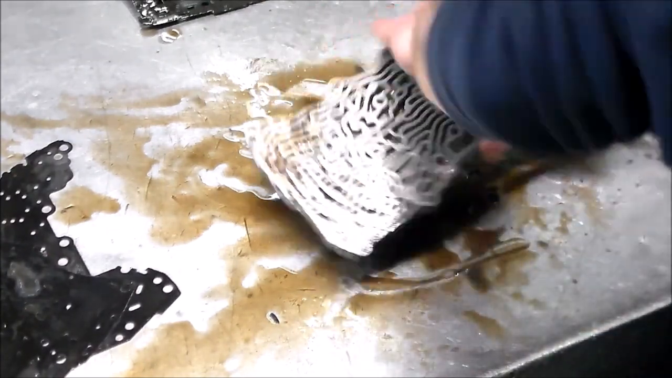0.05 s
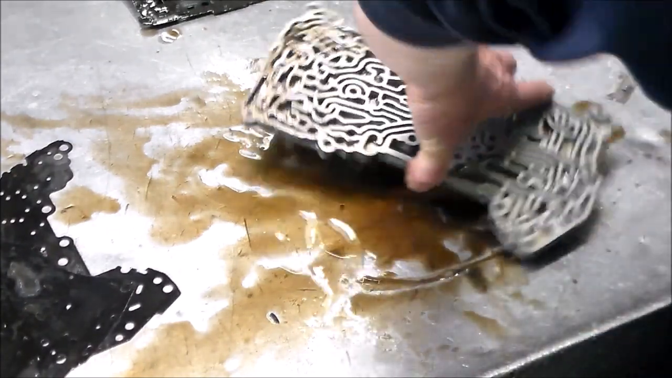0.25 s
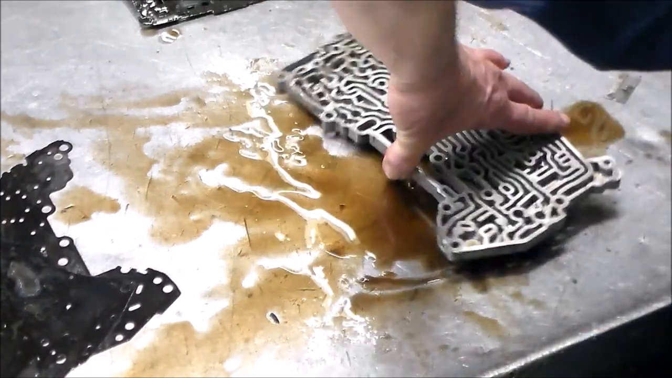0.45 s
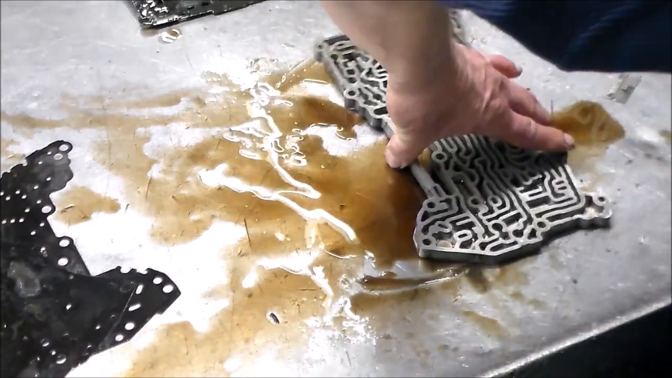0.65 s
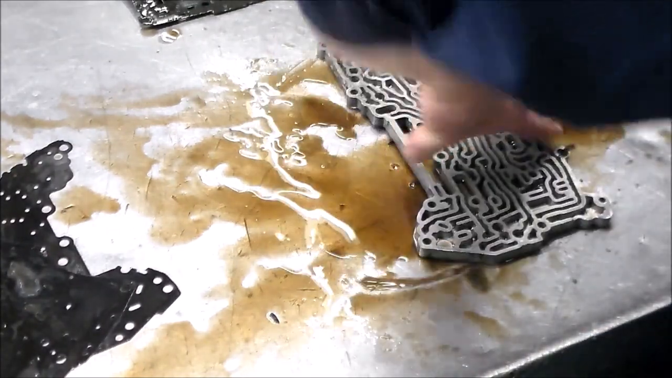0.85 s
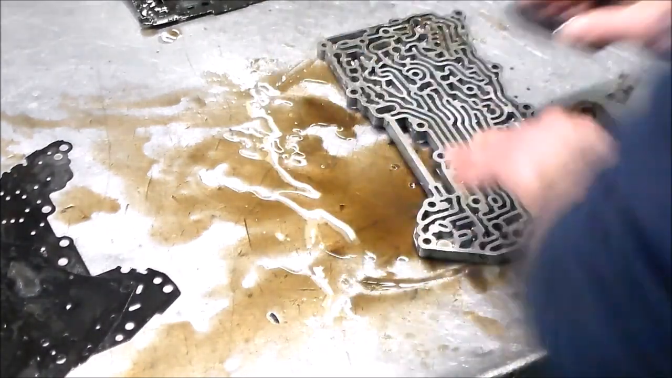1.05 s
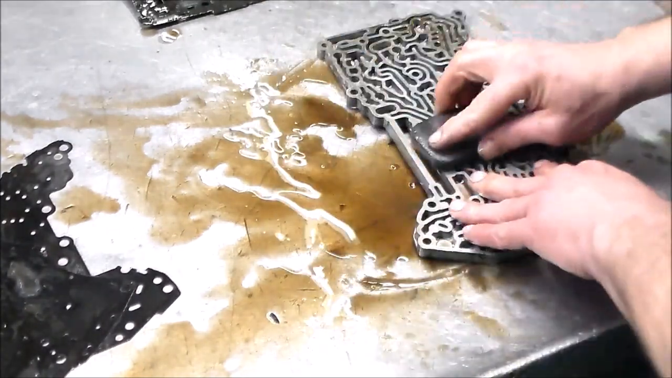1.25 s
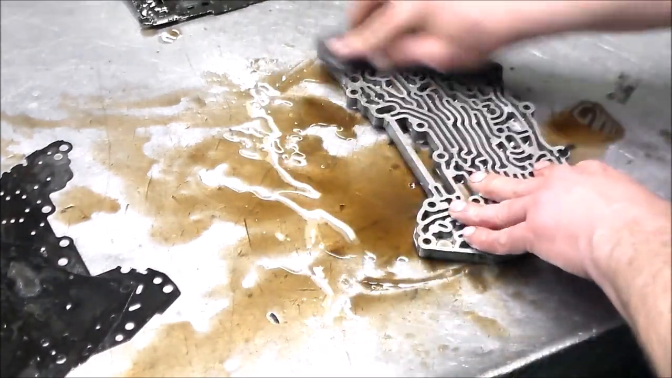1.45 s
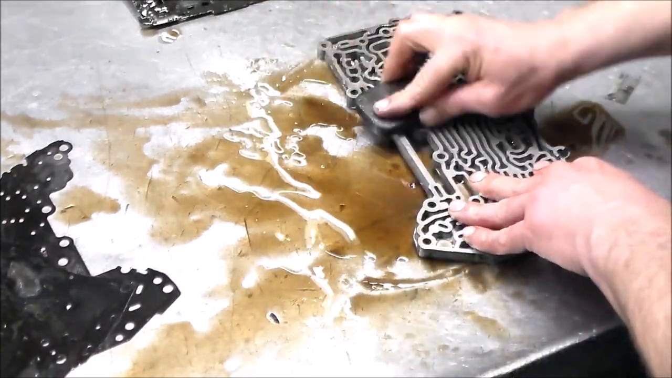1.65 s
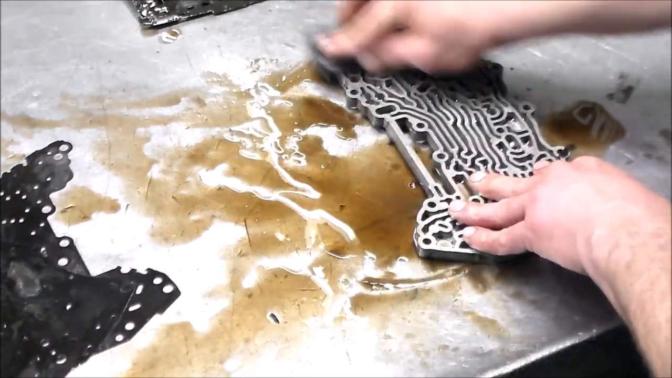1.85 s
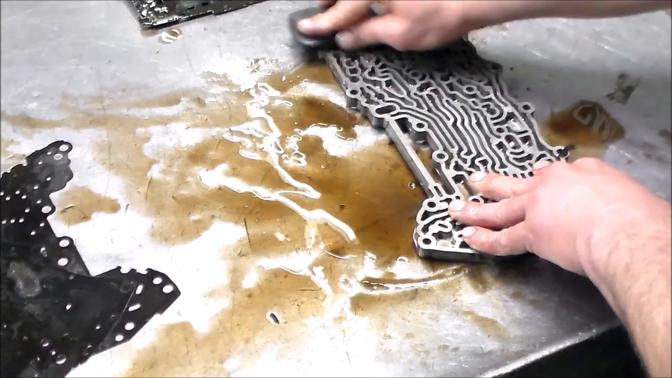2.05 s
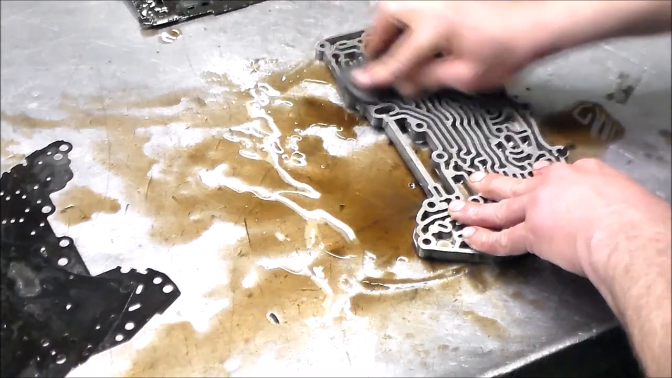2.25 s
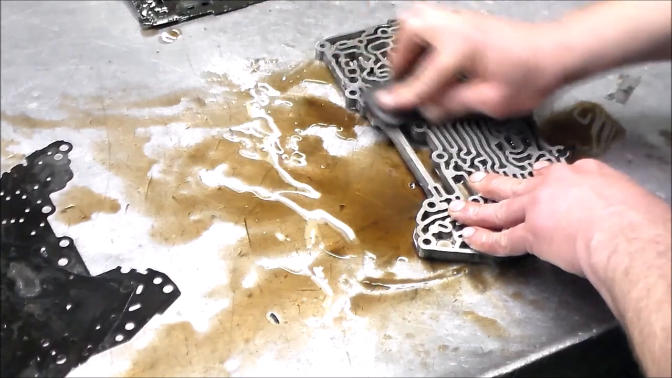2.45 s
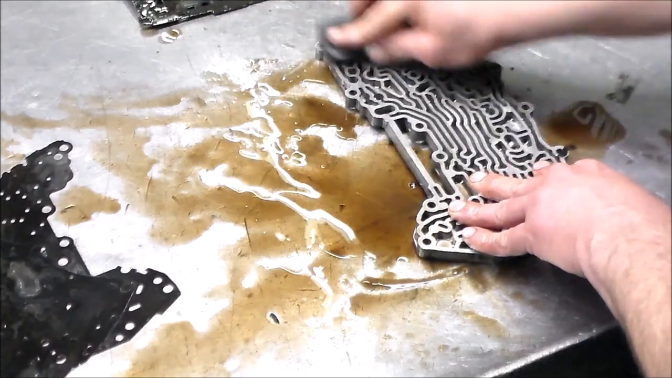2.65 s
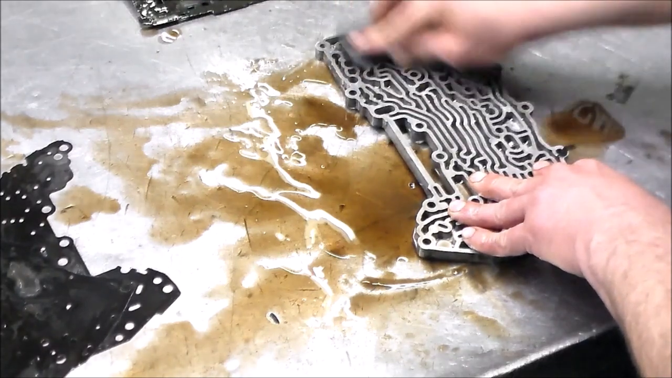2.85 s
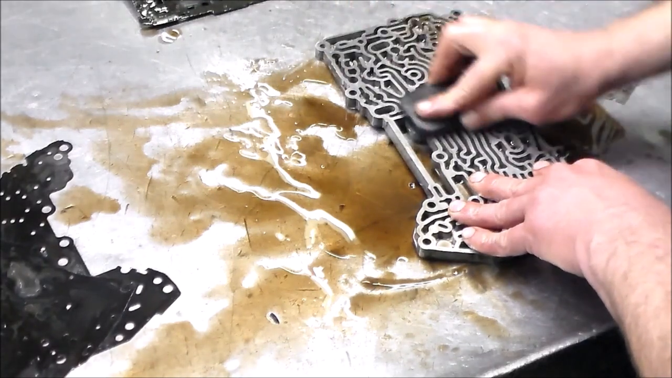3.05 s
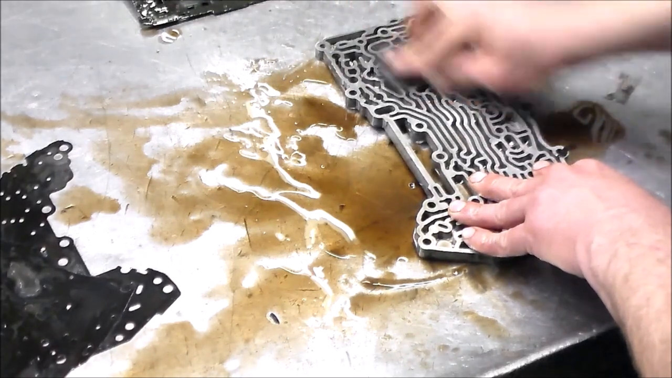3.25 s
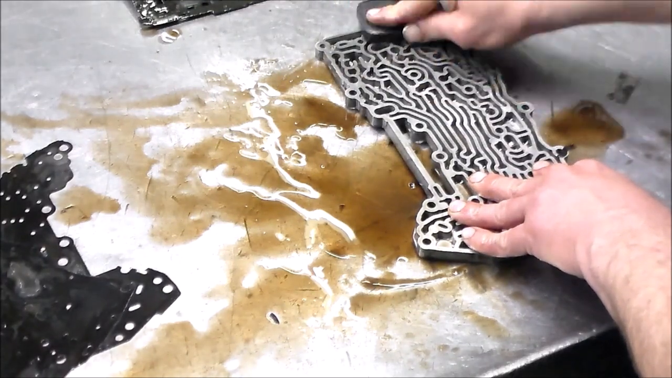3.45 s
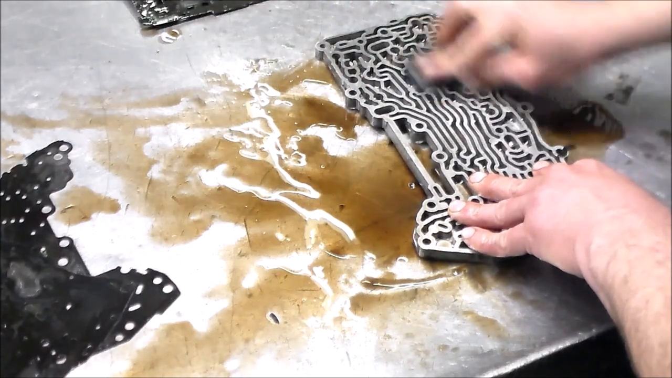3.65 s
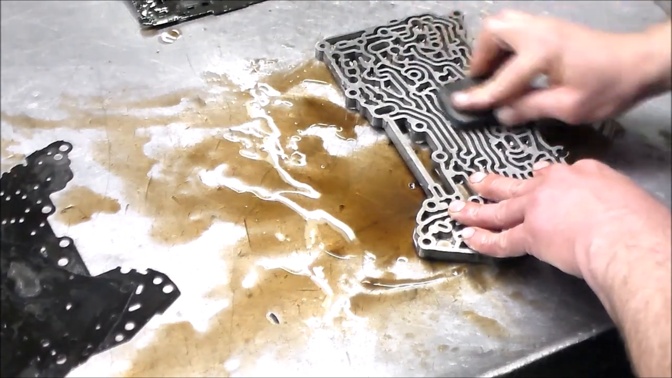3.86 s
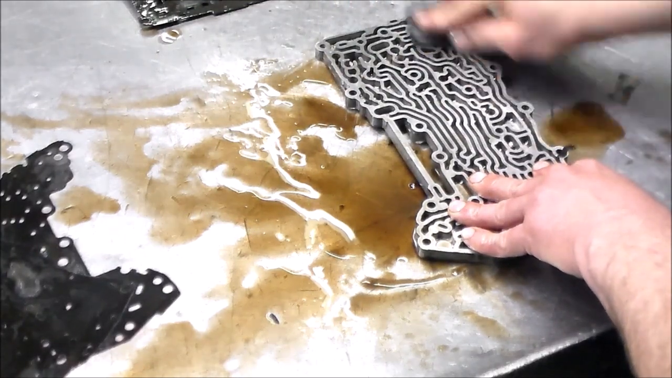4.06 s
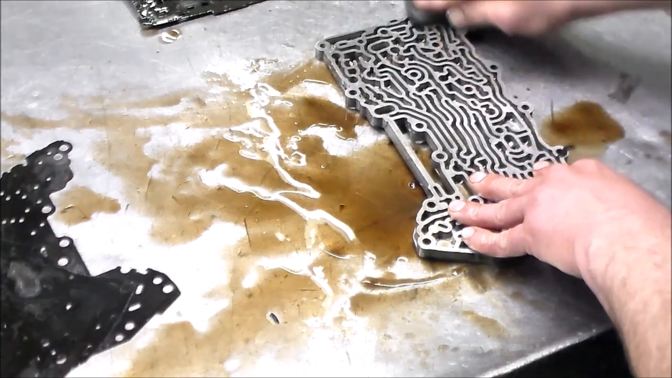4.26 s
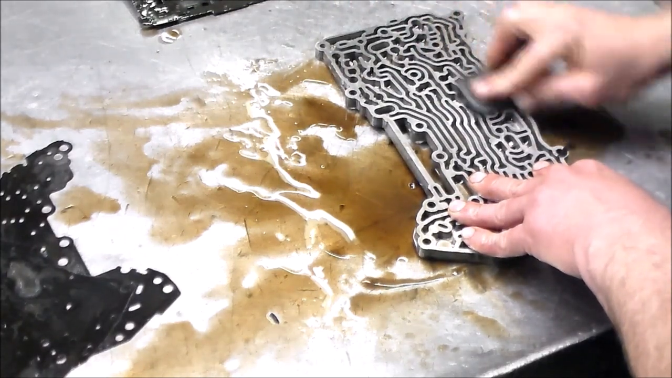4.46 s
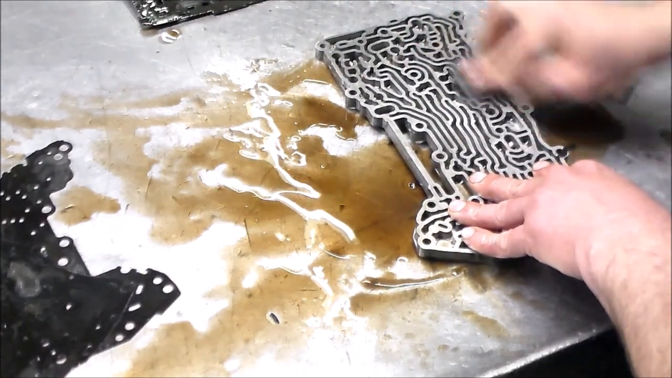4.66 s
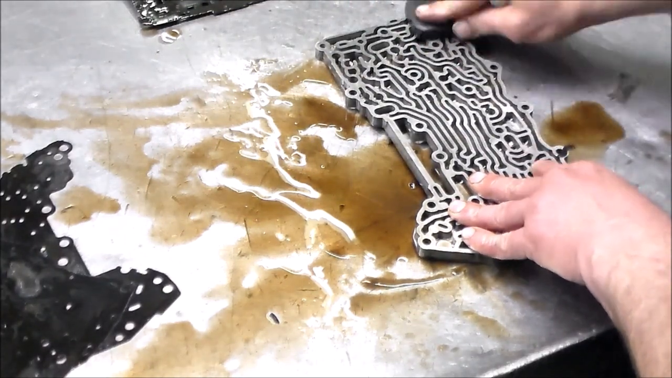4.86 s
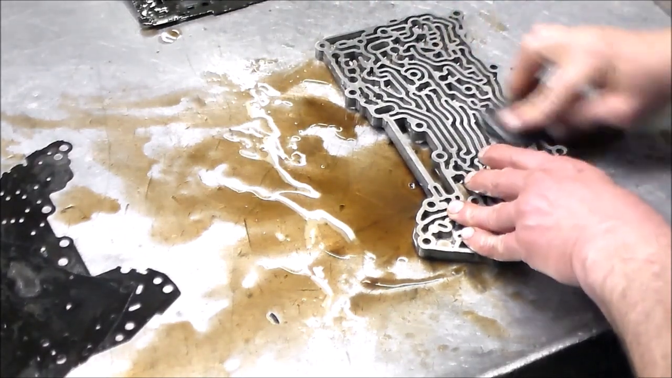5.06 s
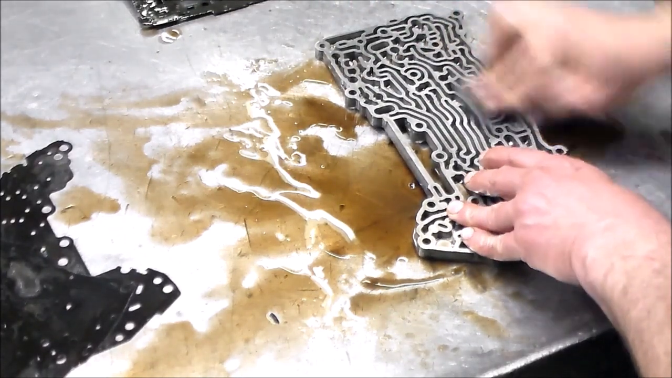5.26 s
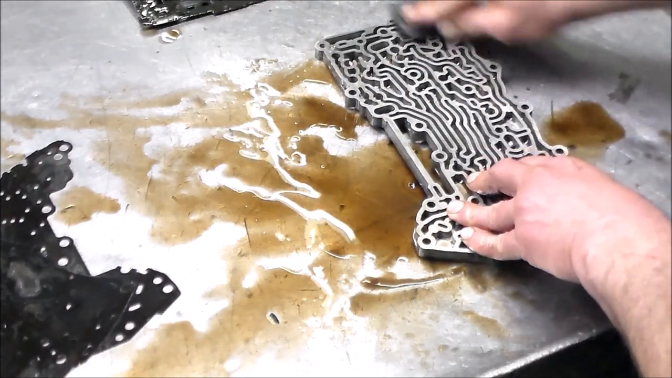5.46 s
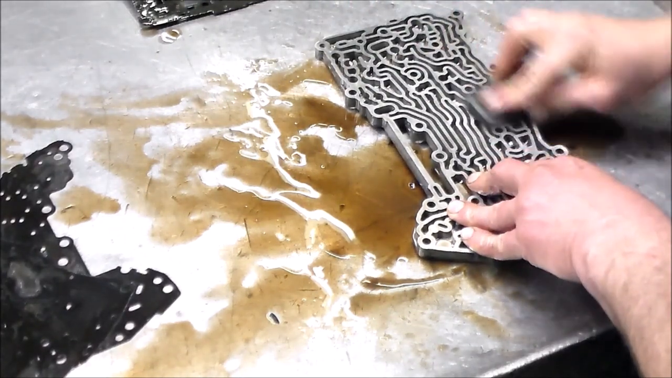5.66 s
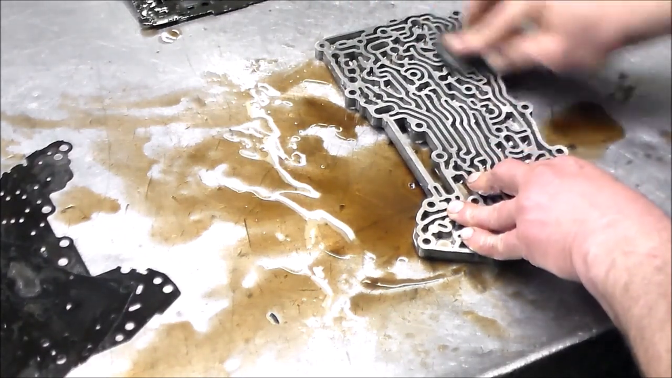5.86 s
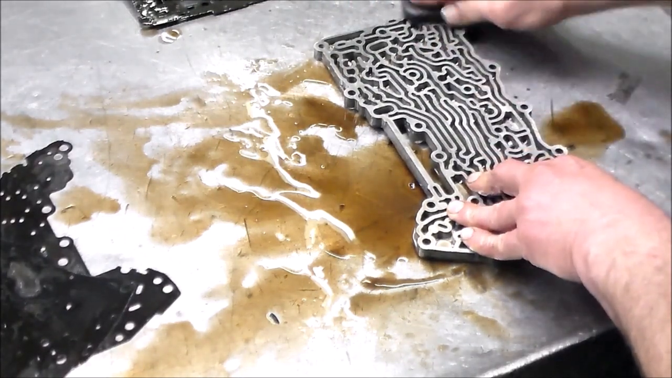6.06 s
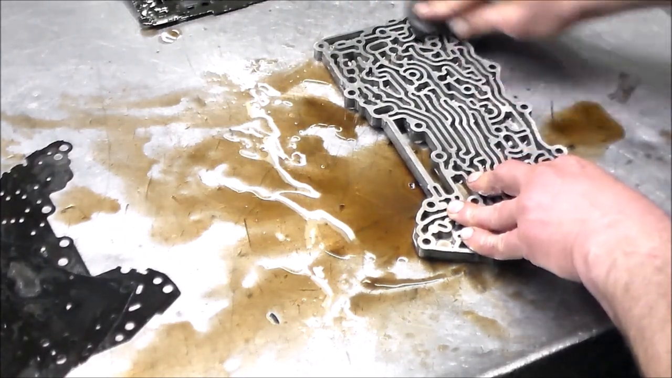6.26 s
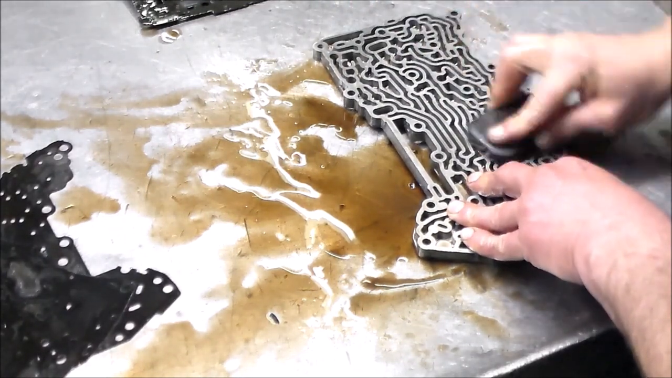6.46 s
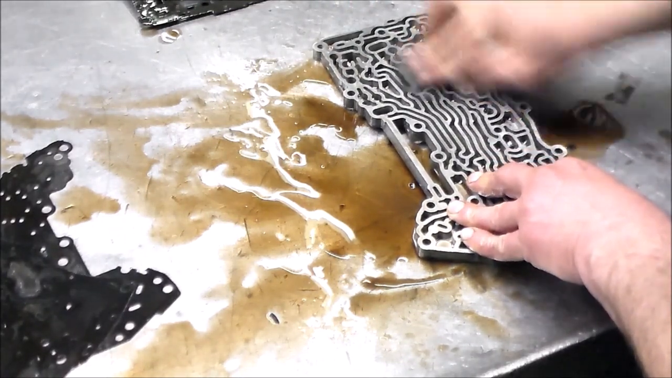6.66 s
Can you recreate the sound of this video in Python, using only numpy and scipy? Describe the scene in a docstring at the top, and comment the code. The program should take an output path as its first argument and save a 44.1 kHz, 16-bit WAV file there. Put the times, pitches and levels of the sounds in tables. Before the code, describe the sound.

Metallic clank and clatter of a plate set on a steel bench, then fast, gritty back-and-forth stone rubbing with sharp catches and brief squeaks.

```python
"""First come a quiet workshop's air noise, faint ticks and a thin wavering tone. A cast metal plate is then
laid on a steel bench and rocks once: cracks, clatter noise, and dying tones of plate and bench. A stone is set
on it and rubbed over its ribs, about seven strokes a second: shaped noise and short rings, with harder catches
and gliding squeaks, while low noise is heard as the bench shakes. A small device with two close microphone
ports stands near; its gain control raises quiet sound."""
import sys
import numpy as np
from scipy import signal
from scipy.fft import rfft, irfft
from scipy.io import wavfile
from scipy.ndimage import uniform_filter1d

SR = 44100
rng = np.random.default_rng(int(sys.argv[2]) if len(sys.argv) > 2 else 0)


def generate_wav(sig):
    """Save sig (samples, or channels by samples) to the path in sys.argv[1] as 16-bit PCM at SR."""
    pcm = np.round(np.clip(np.atleast_2d(sig).T, -1, 1) * 32767).astype(np.int16)
    wavfile.write(sys.argv[1], SR, pcm)


N = 296352

# All source levels are set ahead of the gain control; colours give only the shape of a spectrum.

# workshop air and microphone hiss, colour: (frequency [Hz], level [dB per Hz])
AIR_COLOUR = [(8.8, -72), (15, 10), (39, -20), (59, -10.5), (118, -15), (167, -23), (198, -21.5),
              (362, -27.5), (406, -27), (525, -29.5), (831, -25.5), (2270, -36.5), (14200, -39)]
AIR_DB = -57
# likeness of the air noise at the two ports: (frequency [Hz], likeness [0-1])
AIR_LIKENESS = [(60, 0.81), (230, 0.72), (920, 0.9), (3580, 0), (14000, 0.13)]
# the bench shakes under the arm: (time [s], level [dB])
SHAKE = [(1.47, -73), (1.78, -80), (1.94, -47.5), (2.98, -51), (3.01, -55.5), (3.21, -47.5), (3.3, -58),
         (3.39, -47.5), (3.77, -45.5), (3.84, -53.5), (4.03, -42), (4.12, -49), (4.7, -46), (4.79, -51),
         (4.83, -43.5), (6.22, -44), (6.34, -45.5), (6.72, -48)]
# colour of that shaking: (frequency [Hz], level [dB per Hz])
SHAKE_COLOUR = [(8.8, -32), (15, -6), (59, -1.5), (70, 6.5), (86, -14.5), (108, -9), (157, -9),
                (349, -14.5), (400, -13.5), (520, -25), (880, -120)]
# faint thin tone, before its flicker: (time [s], level [dB])
WHISTLE = [(.17, -90), (.2, -75), (.28, -78), (.31, -85), (.34, -71), (.42, -77), (.45, -90)]
WHISTLE_HZ = 5800  # middle pitch
# faint ticks: (time [s], level [dB], frequency [Hz])
TICKS = [(.06, -69, 4000), (.365, -67, 6500), (.42, -71, 5500), (1.168, -67.5, 5000)]

# likeness of the nearby sounds at the two ports: (frequency [Hz], likeness [0-1])
LIKENESS = [(60, 0.87), (100, 0.92), (180, 0.98), (310, 0.94), (530, 1), (920, 0.96), (1580, 1),
            (2720, 0.92), (4700, 0.63), (8110, 0.26), (14000, 0.38)]
# how far the left port leads: (frequency [Hz], lead [radians])
LEAD = [(0, 0.053), (5170, 0.19), (6030, -0.39), (9040, -0.21), (11800, 0.97), (12200, -0.21),
        (14100, -0.1)]
# how much louder the left port is: (frequency [Hz], left minus right [dB])
LEAN = [(60, -2), (110, 0), (200, -0.5), (370, 0.5), (680, -0.5), (1240, 0.0), (2270, 0.0), (4160, -2),
        (7630, -1.5), (14000, 2.5)]
# how long echoes take to fall 60 dB: (frequency [Hz], t60 [s])
ROOM = [(150, 1), (400, 0.63), (1040, 0.71), (2760, 0.55), (7280, 0.41)]
EDGE_HZ = 14150  # upper band limit of the device

# plate down, plate rocks, stone down: (time [s], crack peak [dB], clatter [dB],
# hardness [dB per octave], ring [dB], thud [dB], room [dB])
BLOWS = [(.590, -14, -27, -.5, -32.5, -35, -26), (.775, -28, -27.5, -1.5, -35, -35, -32),
         (1.367, -18, -25, 2, -33.5, -56, -34)]
# blow by blow, a hand on the plate lowers and damps its modes: (pitch [factor], damping [factor])
HELD = [(1, 1), (1, 3), (.955, 1.8)]
# modes of the plate when not held: (frequency [Hz], relative level [dB], t60 [s])
PLATE = [(662, -12, .2), (996, -18, .19), (1723, -10, .25), (2439, -10, .2), (2698, -6, .5), (2719, 0, .6),
         (2752, -9, .3), (3456, -7, .25), (3962, -12, .15), (4750, -8, .06), (5400, -15, .13)]
# modes of the steel bench top: (frequency [Hz], relative level [dB], t60 [s])
BENCH = [(186, -4, .22), (248, 0, .2), (266, -1, .2), (360, -7, .2), (417, -5, .25), (582, -9, .2),
         (700, -6, .2), (780, -8, .2)]
# the plate's countless small modes together, colour: (frequency [Hz], level [dB per Hz])
CLATTER = [(90, -5), (200, -7), (700, 2), (1500, -5.5), (2700, 0.5), (5400, -4), (7500, -14), (11000, -24),
           (14200, -30)]

# short squeaks as the stone binds, level before the roughness:
# (time [s], length [s], start [Hz], middle [Hz], end [Hz], level [dB])
SQUEAKS = [(3.265, .03, 1450, 1420, 1400, -36), (4.07, .05, 2450, 2300, 2300, -37),
           (4.385, .04, 2900, 2900, 2900, -36), (5.24, .16, 2600, 2230, 2500, -37),
           (6.065, .04, 1250, 1180, 1100, -38), (6.47, .04, 2400, 2450, 2550, -36)]
# hard catches on a rib edge, before the sharing between ports: (time [s], peak [dB], frequency [Hz])
CATCHES = [(1.95, -21, 3080), (2.1188, -24, 2540), (2.5043, -19, 2500), (2.539, -23, 2460),
           (2.7668, -21, 3000), (2.942, -17, 5070), (3.0553, -16.5, 3000), (3.238, -25, 2670),
           (3.3427, -16, 3050), (3.6103, -18, 4380), (3.888, -23, 3060), (4.0814, -20, 2400),
           (4.1641, -29, 2270), (4.3442, -14.5, 4800), (4.4384, -14, 4530), (4.6353, -13.5, 5360),
           (4.7263, -19, 2790), (4.7662, -16.5, 5000), (4.9423, -13, 4350), (5.016, -24, 2800),
           (5.3264, -20, 3800), (5.8696, -13.5, 5200), (6.1208, -11.5, 4440), (6.488, -24, 2400)]
CATCH_RISE_S, CATCH_DRAG_S = 0.00092, 0.0065
CATCH_WIDTH = 1.1  # the band runs from the frequency divided by this to the frequency times this

# strokes of the stone, push and pull in turn: (turn [s], loudest [s], rasp at turn [dB], rasp at loudest [dB],
# breadth of rise [1 = pointed], breadth of fall [1 = pointed], extra scrape at turn [dB],
# extra scrape at loudest [dB], extra grit [dB], hollow under the stone [Hz], basic hollow lift [dB])
STROKES = [(1.482, 1.59, -45.5, -29, 0.96, 1.06, -5, 4.5, -3, 2680, 7.8),
           (1.655, 1.684, -44, -36, 1.4, 2.1, 6.5, 6.5, 0, 2600, 8.1),
           (1.795, 1.887, -51.5, -27, 1.15, 0.97, -2, 7.5, 1.5, 2860, 6.6),
           (1.943, 1.979, -35.5, -25.5, 1.4, 2.5, 5, 4, 2.5, 2700, 8.7),
           (2.062, 2.134, -36, -24.5, 1.4, 1.9, 2, 0, 2, 2600, 9.1),
           (2.207, 2.255, -35, -24, 1.4, 1.7, 6.5, 4, 0.5, 2530, 5.5),
           (2.345, 2.417, -36, -24, 1.5, 1.3, -1.5, 0, 3, 2730, 10),
           (2.481, 2.512, -38.5, -25, 1.1, 1.8, 8, 0, 0.5, 2600, 5.9),
           (2.627, 2.696, -36.5, -23.5, 1.5, 1.5, -2.5, 2.5, 2, 2700, 7.9),
           (2.757, 2.811, -38, -24.5, 1.5, 1.24, 0.5, 5, -1, 2610, 9.3),
           (2.908, 2.973, -35, -22.5, 1.4, 1.9, -1.5, -0.5, 2, 2680, 5.2),
           (3.04, 3.074, -36.5, -25, 1.5, 3.1, 0, 4, 2, 2750, 7.6),
           (3.18, 3.262, -34.5, -23, 1.6, 1.8, -3.5, 0.5, 4, 2860, 5.1),
           (3.318, 3.364, -40, -25, 1.7, 1.7, 1.5, 2, 1, 2730, 6),
           (3.465, 3.545, -34.5, -21.5, 1.3, 2, -3.5, -2.5, 0.5, 2600, 3),
           (3.593, 3.624, -34, -23.5, 1.3, 1.5, 0, 0, -2, 2540, 7.1),
           (3.741, 3.813, -33, -19.5, 0.95, 1.7, -6, -3, -1, 2710, 0.67),
           (3.869, 3.922, -37, -23, 1.8, 0.96, -2, 2.5, -0.5, 2610, 5.5),
           (4.004, 4.1, -34.5, -21.5, 1.06, 1.2, -0.5, -4, -0.5, 2480, 4.7),
           (4.151, 4.192, -35.5, -23, 1.8, 1.1, 4, -2, -2.5, 2570, 7),
           (4.282, 4.38, -35, -20.5, 1.6, 1.1, -0.5, -4.5, -3, 2770, 1),
           (4.426, 4.446, -36, -26.5, 3.8, 1.7, 8.5, 1.5, 1.5, 2580, 8.6),
           (4.572, 4.637, -33, -24, 1.5, 2.6, 1, 3.5, 1, 2700, 3.8),
           (4.707, 4.77, -35, -26, 2.3, 4, 1, 5.5, 2.5, 2680, 5),
           (4.858, 4.933, -38, -24.5, 3, 1.6, 7.5, 5, 1, 2530, 4),
           (5.005, 5.05, -36, -25, 2.5, 2, -0.5, 4, 3, 2680, 4),
           (5.16, 5.26, -33, -23, 2.5, 1.9, 5.5, 2.5, -0.5, 2520, 1),
           (5.324, 5.33, -39.5, -25.5, 0.89, 3.6, 3.5, -0.5, 4.5, 2570, 0.67),
           (5.474, 5.546, -31.5, -23.5, 3.3, 3.1, 9, -0.5, 2.5, 2740, 4.3),
           (5.622, 5.666, -35, -23.5, 2, 0.73, 3, -4, -2, 2690, 5.6),
           (5.762, 5.85, -33.5, -23, 2.1, 2.2, 2.5, 3.5, 2, 2770, 1),
           (5.901, 5.935, -35.5, -26.5, 1.2, 3.4, 0.5, 2, -2, 2710, 4),
           (6.04, 6.098, -36, -23, 1.6, 2.4, 8.5, 6.5, -3, 2660, 0.68),
           (6.174, 6.208, -37.5, -25, 1.26, 3.2, 5.5, 10, -3.5, 2630, 3.5),
           (6.307, 6.393, -37, -22.5, 2.4, 2.2, 8.5, 6, -2.5, 2770, 1),
           (6.43, 6.465, -35.5, -22.5, 1.4, 0.94, 7.5, 1, 0, 2630, 4.7),
           (6.585, 6.695, -35, -21.5, 1.6, 1.4, -3, 1.5, 1.5, 2630, 2.4)]
STOP_S = 6.75  # the last stroke ends
# how sound follows the place on the plate; a push runs 0-1, a pull 1-2:
# (place [strokes], scrape share of the swell [0-1], extra hollow lift [dB])
CYCLE = [(0, .4, 1), (.25, .5, -6), (.5, 0.4, -3.5), (.75, .75, -0.5), (.9, 0.72, -2), (1, .65, -1),
         (1.25, .9, -2), (1.5, 0.39, -3.5), (1.75, 0.58, -2.5), (1.998, 0.59, -2)]
# stone on ribs through the microphone, basic colour: (frequency [Hz], level [dB per Hz])
RASP = [(120, -59), (200, -32.5), (500, -16), (630, -11.5), (930, -10.5), (1300, -7), (2000, -7),
        (2400, -4), (3600, -4), (5200, -2), (6900, -8), (8000, -14), (10200, -12), (12300, -18),
        (14200, -28)]
# change just under the hollow as the stone works other parts of the plate: (time [s], change [dB])
UNDER = [(1.5, 1), (2.1, 1.5), (2.8, -0.5), (3.3, 4.5), (3.9, 0.5), (4.5, -1), (5, -5.5), (5.3, -3.5),
         (5.7, -3), (6.2, -5.5), (6.7, -1.5)]
UNDER_HZ, UNDER_WIDTH_HZ = 1540, 430
HOLLOW_WIDTH_HZ = 760
SCRAPE_EDGE_HZ, GRIT_EDGE_HZ = 1680, 7000  # scrape meets rasp, rasp meets grit
GRIT_DIP_DB = 2  # grit sinks this far below the rasp at a turn, before the extra grit
GRIT_SPEED_POWER = 0.56  # how grit follows the stone's speed


def gain_of(db):
    """Turns decibels into a multiplier."""
    return 10 ** (np.asarray(db) / 20)


def evened(x):
    """Scales to an average strength (rms) of 1."""
    return x / np.sqrt(np.mean(np.abs(x) ** 2) + 1e-20)


def read(points, hz):
    """Reads a spectrum table along a logarithmic frequency axis."""
    f, value = np.transpose(points)
    return np.interp(np.log(hz + 1), np.log(f + 1), value)


def add(mix, s, sound):
    """Mixes a sound in from time s, in seconds."""
    part = mix[round(s * SR):][:len(sound)]
    part += sound[:len(part)]


def patches(shape, bins, frames):
    """Makes a smooth random pattern over frequency and time, rms 1."""
    field = rng.standard_normal(shape)
    field = uniform_filter1d(field, size=bins, axis=0)
    return evened(uniform_filter1d(field, size=frames, axis=1))


def ports(pair, likeness, size, field_db=None):
    """Turns a shared and a differing signal into left and right, with the ports' lead and lean."""
    overlap = size * 3 // 4
    hz, t, (shared, differing) = signal.stft(pair, SR, nperseg=size, noverlap=overlap)
    alike = np.clip(read(likeness, hz), 0, 1)[:, None]
    mid = np.sqrt((1 + alike) / 2) * shared
    side = np.sqrt((1 - alike) / 2) * differing
    # each port takes half of the difference in level and timing
    half = (gain_of(read(LEAN, hz) / 2) * np.exp(.5j * read(LEAD, hz)))[:, None]
    z = np.array([(mid + side) * half, (mid - side) / half])
    if field_db is not None:
        z = z * gain_of(field_db(hz[:, None], t))
    return signal.istft(z, SR, nperseg=size, noverlap=overlap)[1][:, :N]


def room(x):
    """Adds up sparse echoes of random sign; each frequency band dies at its own speed."""
    taps = np.zeros((2, SR))
    at = np.arange(200, SR - 20, 20) + rng.integers(0, 20, (2, (SR - 201) // 20))
    np.put_along_axis(taps, at, rng.choice([-1., 1.], at.shape), 1)
    hz, t, z = signal.stft(taps, SR, nperseg=256)
    fading = z * gain_of(-60 * t / read(ROOM, hz)[:, None])
    tail = signal.istft(fading, SR, nperseg=256)[1]
    return signal.fftconvolve(x[None], tail / np.linalg.norm(tail[0]), axes=1)[:, :N]


def bed(colour, likeness, patchy_db):
    """Makes noise of a given colour whose level varies in random patches."""
    def lumps_db(hz, t):
        return read(colour, hz) + patchy_db * patches((len(hz), len(t)), bins=4, frames=8)

    return evened(ports(rng.standard_normal((2, N)), likeness, size=2048, field_db=lumps_db))


def workshop_air():
    """Workshop air and microphone hiss are random motion, heard as soft, almost steady noise."""
    return gain_of(AIR_DB) * bed(AIR_COLOUR, AIR_LIKENESS, patchy_db=-0.5)


def bench_shake():
    """The arm shakes the bench, heard as low noise that swells and sinks."""
    level_db = np.interp(np.arange(N) / SR, *np.transpose(SHAKE), left=-120)
    return gain_of(level_db) * bed(SHAKE_COLOUR, LIKENESS, patchy_db=2.5)


def whistle():
    """A faint sine tone wavers in pitch and flickers in strength."""
    t = np.arange(N) / SR
    wobble, flicker = uniform_filter1d(rng.standard_normal((2, N)), size=400)
    turns = np.cumsum(WHISTLE_HZ + 60 * evened(wobble)) / SR
    level_db = np.interp(t, *np.transpose(WHISTLE), left=-120, right=-120)
    return gain_of(level_db) * np.sin(2 * np.pi * turns) * (.5 + evened(flicker))


def ticks():
    """Faint ticks are very short puffs of noise, each in its own band."""
    near = np.zeros((2, N))
    for s, db, hz in TICKS:
        puff = rng.standard_normal(600) * np.hanning(600)
        band = signal.butter(1, [hz / 2.0, hz * 1.3], "band", fs=SR)
        add(near[0], s, gain_of(db) * evened(signal.lfilter(*band, puff)))
    return ports(near, LIKENESS, size=256)


def ring(modes, t, spread_db):
    """One blow starts many dying tones; each blow lands elsewhere and so weighs them anew."""
    hz, db, t60 = np.transpose(modes)[:, :, None]
    db = db + spread_db * rng.standard_normal(hz.shape)
    return (gain_of(db - 60 * t / t60) * np.sin(2 * np.pi * hz * t)).sum(0)


def blows():
    """Contact cracks and sets off dense clatter, clear plate tones, a bench thud and echoes."""
    near, far = np.zeros((2, N)), np.zeros(N)
    t = np.arange(SR // 2) / SR
    hz = np.fft.rfftfreq(len(t), 1 / SR)
    for blow, (pitch, damping) in zip(BLOWS, HELD):
        s, crack_db, clatter_db, tilt_db, ring_db, thud_db, room_db = blow
        noise = rfft(rng.standard_normal((2, 2, len(t))))
        # the first contact is brighter
        sharp_colour = gain_of(0.45 * read(CLATTER, hz)) * hz / (hz + 2500)
        sharp = evened(irfft(noise[0] * sharp_colour, len(t)))
        crack = sharp * (1 - np.exp(-t / 0.0001)) * np.exp(-t / 0.0006)
        crack = gain_of(crack_db) * crack / abs(crack[0]).max()

        rattle_colour = gain_of(read(CLATTER, hz) + tilt_db * np.log2(hz / 2500 + 0.011))
        rattle = evened(irfft(noise[1] * rattle_colour, len(t)))
        clatter = rattle * (1 - np.exp(-t / 0.0015)) * np.exp(-t / 0.016)

        held_plate = np.multiply(PLATE, [pitch, 1, 1 / damping])
        plate = gain_of(ring_db) * ring(held_plate, t, spread_db=1.5) * (1 - np.exp(-t / 0.0003))
        thud = gain_of(thud_db) * ring(BENCH, t, spread_db=2.5) * (1 - np.exp(-t / 0.012))
        tones = plate + thud
        # the tones belong to the shared signal only
        add(near.T, s, (crack + gain_of(clatter_db) * clatter + tones * [[1], [0]]).T)
        add(far, s, gain_of(room_db) * clatter[0] + .15 * tones)
    return ports(near + room(far), LIKENESS, size=256)


def squeaks():
    """The stone binds and gives short gliding tones of uneven strength."""
    out = np.zeros(N)
    for s, length, *hz, db in SQUEAKS:
        u = np.linspace(0, 1, round(length * SR))
        rough = evened(uniform_filter1d(rng.standard_normal(len(u)), size=120))
        glide_hz = np.polyval(np.polyfit([0, .5, 1], hz, 2), u)
        tone = np.sin(2 * np.pi * np.cumsum(glide_hz) / SR)
        add(out, s, gain_of(db) * signal.windows.tukey(len(u), .5) * (1 + .7 * rough) * tone)
    return out


def catches():
    """The stone catches hard on rib edges: short bursts of noise, each in the band of its rib."""
    out, t = np.zeros((2, N)), np.arange(2000) / SR
    drag = (1 - np.exp(-t / CATCH_RISE_S)) * np.exp(-t / CATCH_DRAG_S)
    for s, db, hz in CATCHES:
        band = signal.butter(1, [hz / CATCH_WIDTH, hz * CATCH_WIDTH], "band", fs=SR)
        burst = signal.lfilter(*band, rng.standard_normal((2, len(t)))) * drag
        add(out.T, s, gain_of(db) * burst.T / abs(burst).max())
    return ports(out, LIKENESS, size=256)


def ribs(cycles, count=5000, size=1000):
    """Single ribs, each with its own pitch, ring briefly when the stone catches them."""
    when, pitch, luck = rng.random((count, 3)).T[:, :, None]
    hz, t = 900 * 12.0 ** pitch, np.arange(size) / SR
    rings = hz ** 2 * t * np.exp(-hz * t / cycles) * np.sin(2 * np.pi * hz * t)
    # a few catches are hard; a fade closes each ring
    rings = rings * gain_of(-3 * np.log(luck + .03)) * np.hanning(2 * size)[size:]
    at = (when * N).astype(int) + np.arange(size)
    return evened(np.bincount(at.ravel(), rings.ravel())[:N])


def motion(t):
    """The stone's place in its stroke sets the rasp level and the colour that goes with it."""
    (turn_s, top_s, turn_db, top_db, rise, fall, turn_scrape_db, top_scrape_db,
     grit_db, hollow_hz, hollow_db) = np.transpose(STROKES)
    count = len(STROKES)
    marks = np.append(np.ravel([turn_s, top_s], "F"), STOP_S)  # turn, loudest, turn, loudest ...
    stroke = np.clip(np.searchsorted(turn_s, t, "right") - 1, 0, count - 1)

    # -1 at the turn, 0 at the loudest point, 1 at the next turn
    swell = np.interp(t, marks, np.arange(len(marks))) - 2 * stroke - 1
    share = 1 - abs(swell) ** np.where(swell < 0, rise[stroke], fall[stroke])
    rest = np.interp(t, turn_s, turn_db)
    rasp = rest + share * (top_db[stroke] - rest)

    place = np.interp(t, np.append(turn_s, STOP_S), np.arange(count + 1)) % 2
    at, *shape = np.transpose(CYCLE)
    scrape_share, lift = (np.interp(place, at, y) for y in shape)
    top, extra_grit, hz, hollow = (np.interp(t, top_s, y) for y in (top_db, grit_db, hollow_hz, hollow_db))
    extra_scrape = np.interp(t, marks[:-1], np.ravel([turn_scrape_db, top_scrape_db], "F"))

    # scrape and grit are given relative to the rasp
    scrape = rest + scrape_share * (top - rest) + extra_scrape - rasp
    speed = abs(np.sin(np.pi * place)) ** GRIT_SPEED_POWER
    grit = top - (1 - speed) * (top - rest + GRIT_DIP_DB) + extra_grit - rasp
    return rasp, scrape, grit, hz, hollow + lift


def rubbing_colour_db(hz, t):
    """The stone's path shifts low scrape, fine grit and the resonance of the hollows it covers."""
    _, scrape, grit, hollow_hz, hollow_db = motion(t)
    low = 1 / (1 + (hz / SCRAPE_EDGE_HZ) ** 6)
    below_grit = 1 / (1 + (hz / GRIT_EDGE_HZ) ** 6)
    # the channels that the stone covers resonate, each at its own pitch
    hollow = np.exp(-((hz - hollow_hz) / HOLLOW_WIDTH_HZ) ** 2) * hollow_db
    under = np.exp(-((hz - UNDER_HZ) / UNDER_WIDTH_HZ) ** 2) * np.interp(t, *np.transpose(UNDER))
    shift = low * scrape + under + hollow + (1 - below_grit) * grit
    # the held plate's close modes drift with the stone
    comb = patches((len(hz), len(t)), bins=1, frames=70)
    flicker = patches((len(hz), len(t)), bins=3, frames=12)
    return read(RASP, hz) + shift + 1.9 * comb + 1.8 * flicker


def rubbing():
    """Stone on ribs gives dense grit, roughened by small catches, with ringing ribs and echoes."""
    hit = rng.random(N) < 500 / SR  # about 500 small catches a second
    catch = gain_of(4.9 * np.minimum(rng.exponential(1, N), 4)) * hit
    burst = signal.lfilter([1], [1, -np.exp(-1 / (0.0052 * SR))], catch)  # each catch drags for a moment
    grit = rng.standard_normal((2, N)) * (1 + 0.32 * evened(burst))
    body = evened(grit) + gain_of(-12) * ribs(cycles=8.9) * [[1], [.3]]

    sound = evened(ports(body, LIKENESS, size=512, field_db=rubbing_colour_db))
    t = np.arange(N) / SR
    stone_is_down = t > BLOWS[-1][0]
    sound = sound * gain_of(motion(t)[0]) * stone_is_down
    echoes = ports(room(sound.mean(0)), LIKENESS, size=256)
    return sound + gain_of(-11) * echoes


def scene():
    """Adds all sources together at the two ports."""
    background = workshop_air() + bench_shake() + whistle() + ticks()
    return background + blows() + squeaks() + catches() + rubbing()


def record(dry):
    """Gain control lifts the quiet, drops at a loud sound and comes back; then the treble is cut off."""
    power = uniform_filter1d((dry ** 2).mean(0), size=400, origin=199)
    power_db = 10 * np.log10(abs(power) + 1e-12)
    fall = np.arange(N) * 69.0 / SR  # the detector sinks 69 dB a second
    held_db = np.maximum.accumulate(power_db + fall) - fall
    lift_db = np.clip(-47.5 - held_db, 0, 10.5)
    lifted = dry * gain_of(uniform_filter1d(lift_db, size=200, origin=99))
    low_pass = signal.firwin(511, EDGE_HZ, window=("kaiser", 9), fs=SR)
    return signal.oaconvolve(lifted, low_pass[None], "same")


dry = scene()
out = record(dry)
generate_wav(out)
```